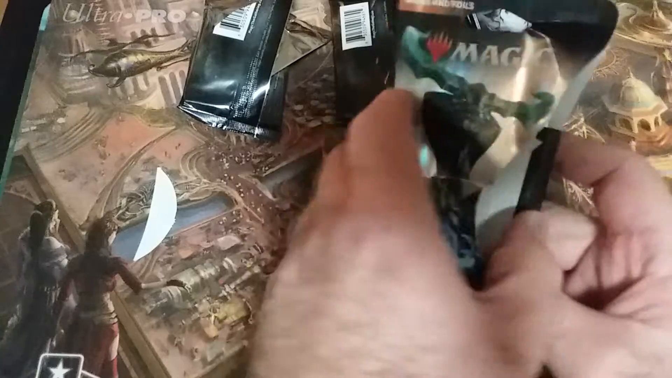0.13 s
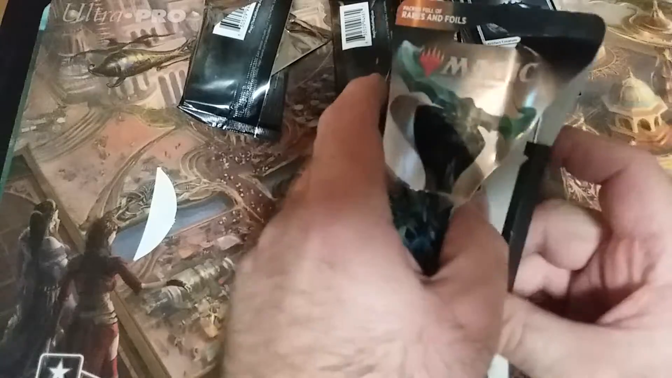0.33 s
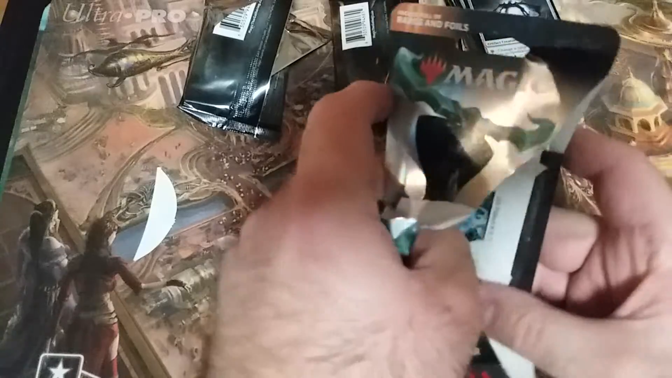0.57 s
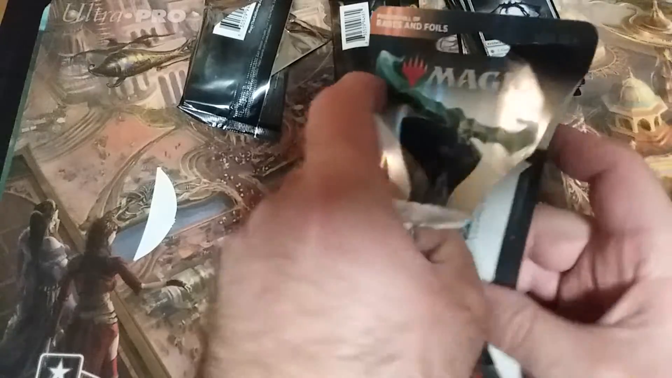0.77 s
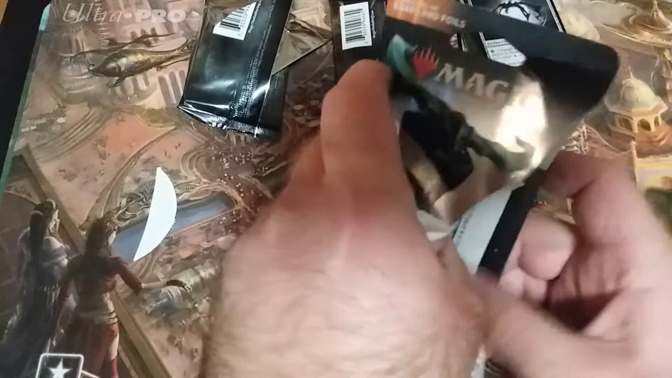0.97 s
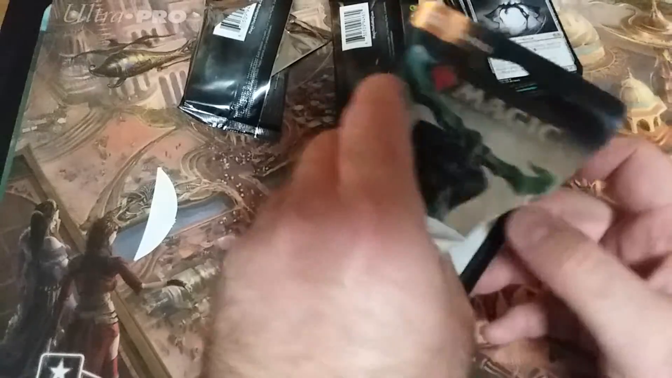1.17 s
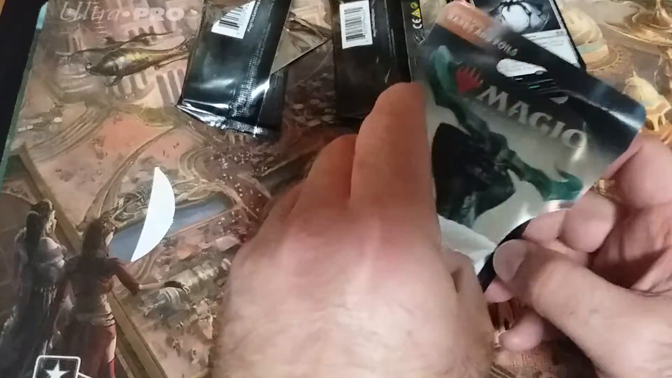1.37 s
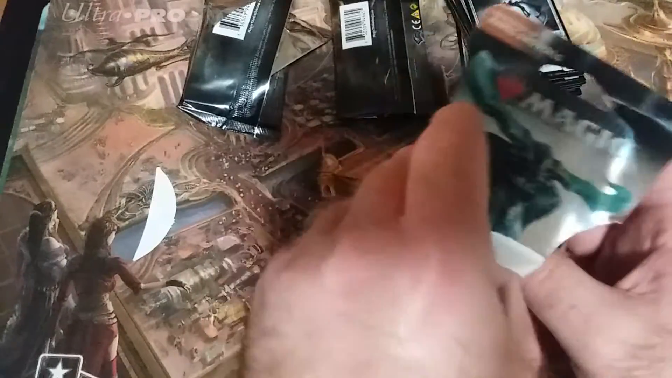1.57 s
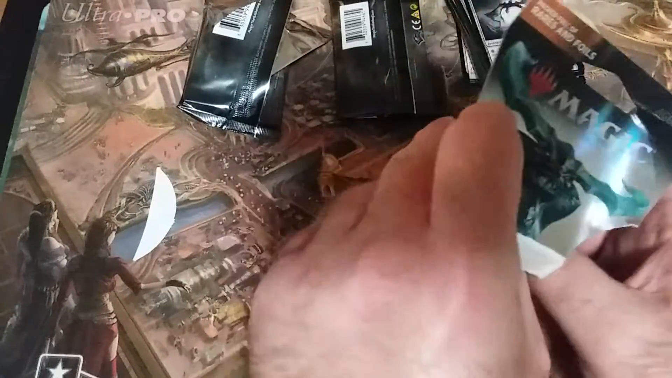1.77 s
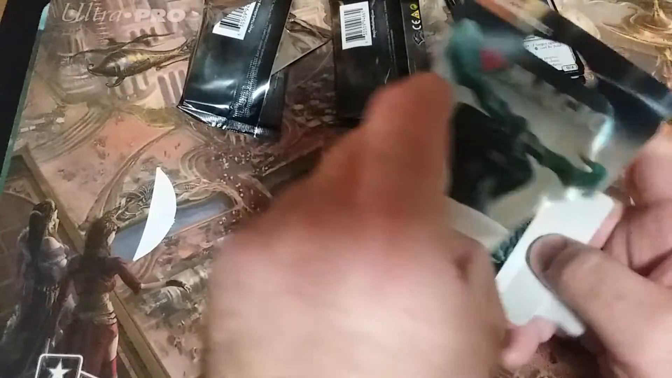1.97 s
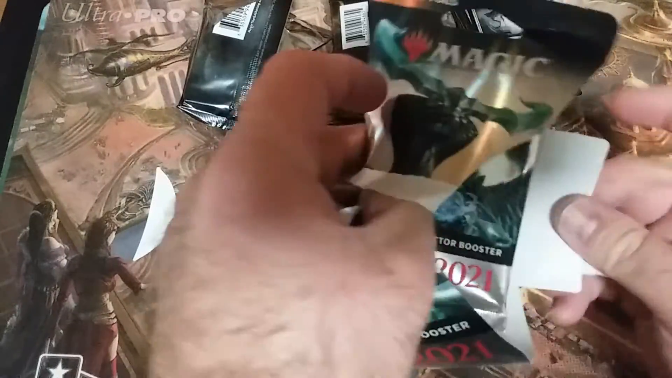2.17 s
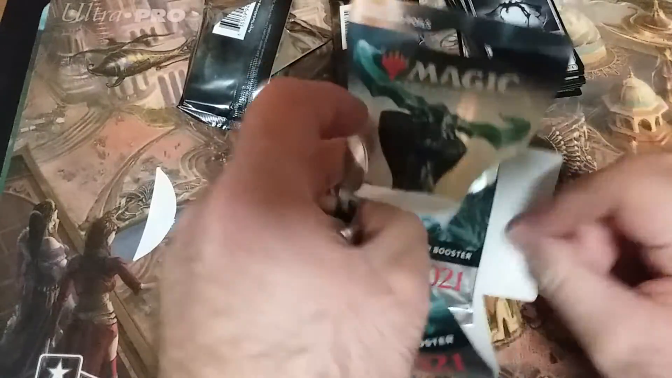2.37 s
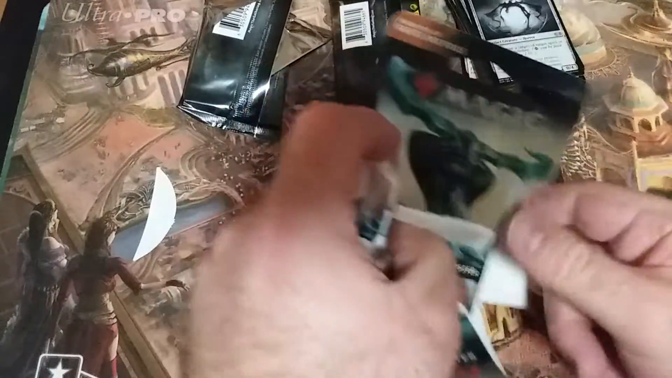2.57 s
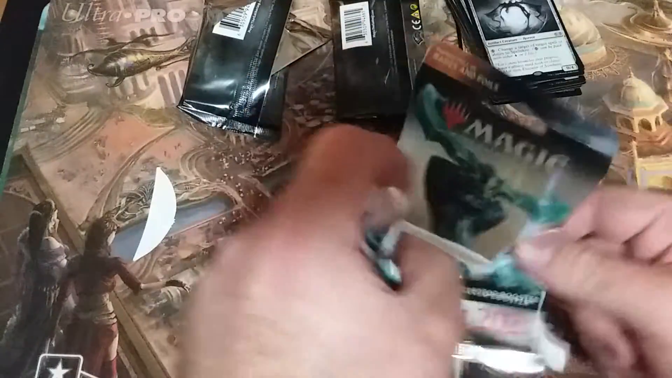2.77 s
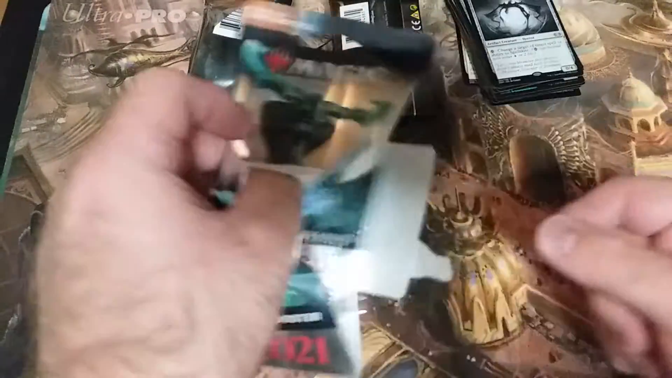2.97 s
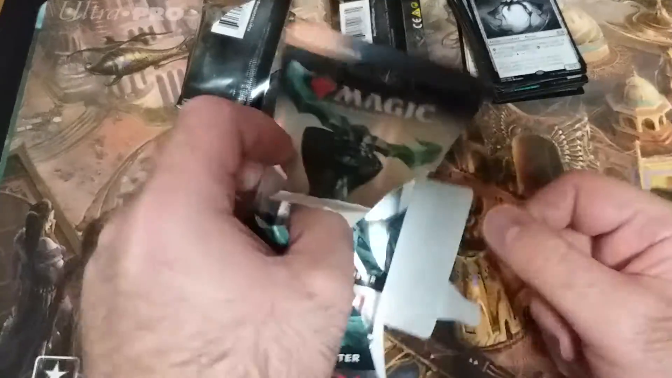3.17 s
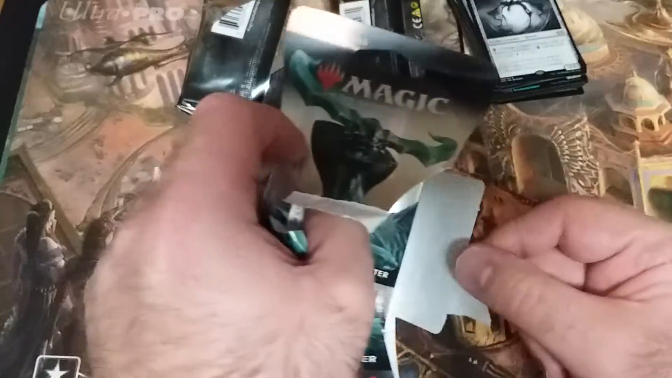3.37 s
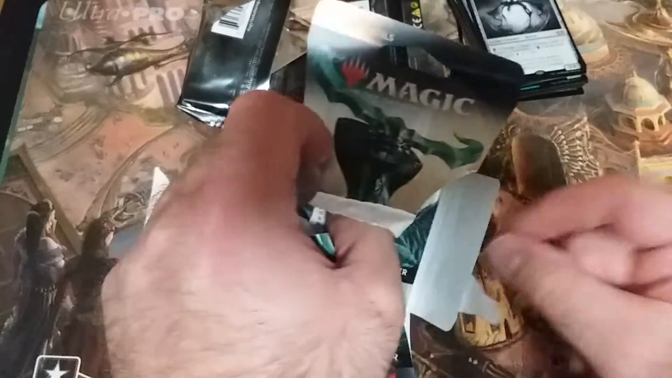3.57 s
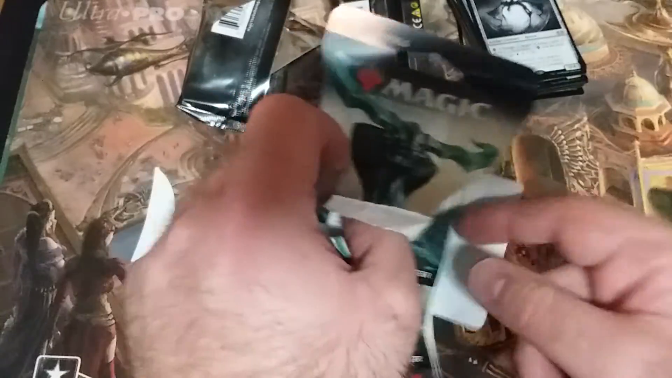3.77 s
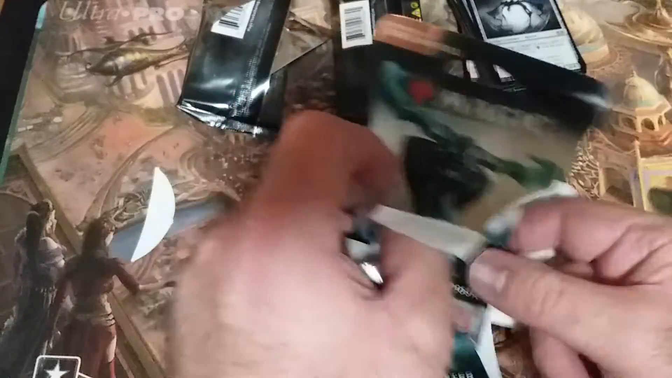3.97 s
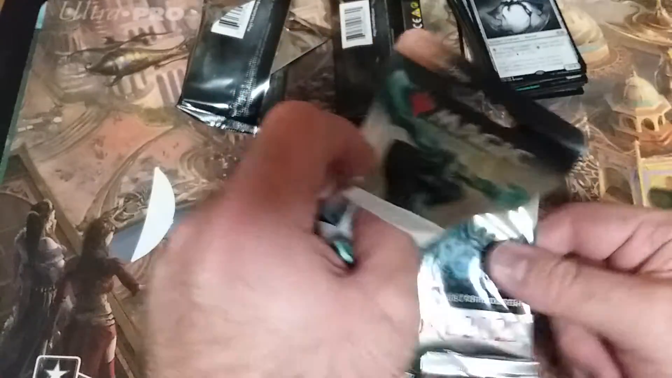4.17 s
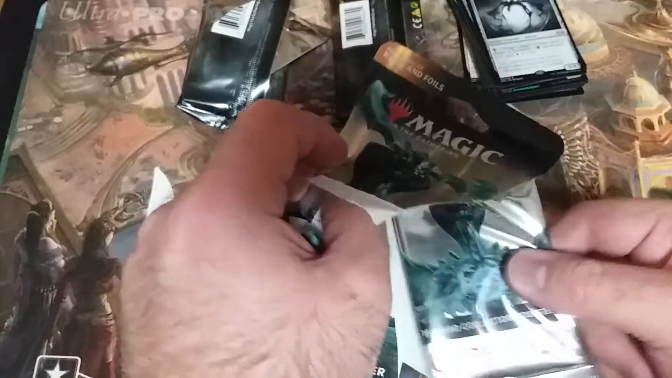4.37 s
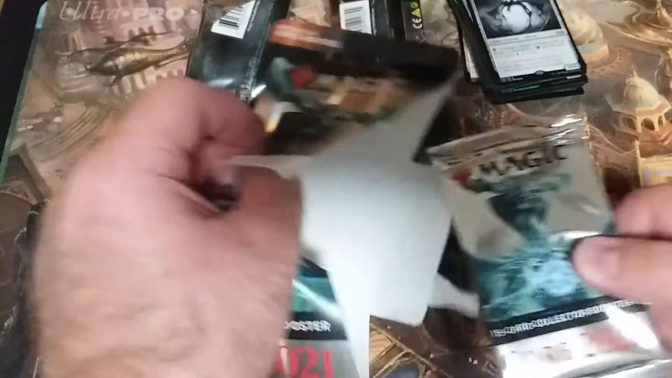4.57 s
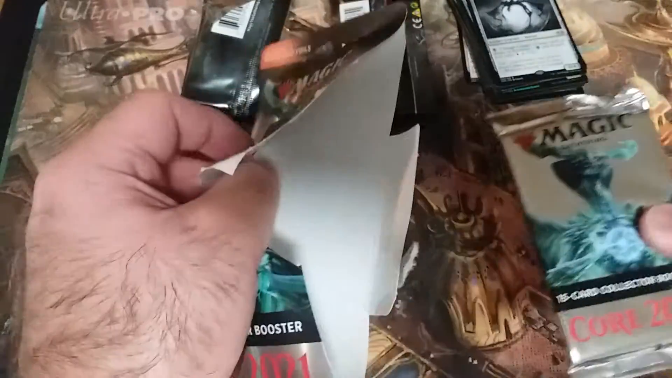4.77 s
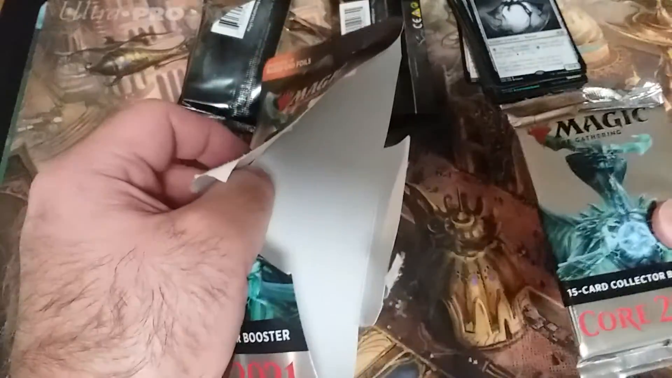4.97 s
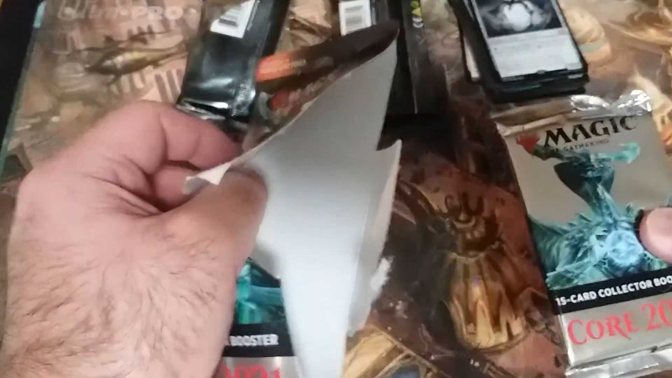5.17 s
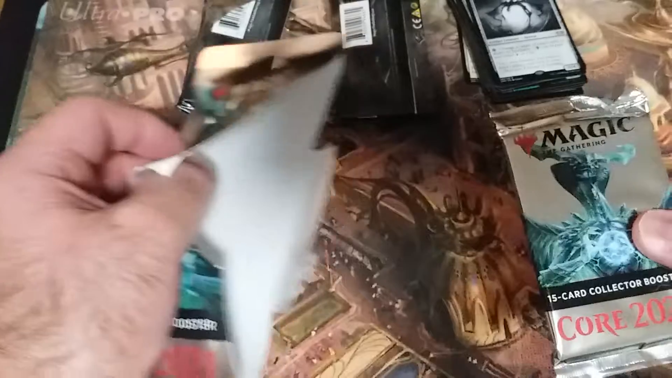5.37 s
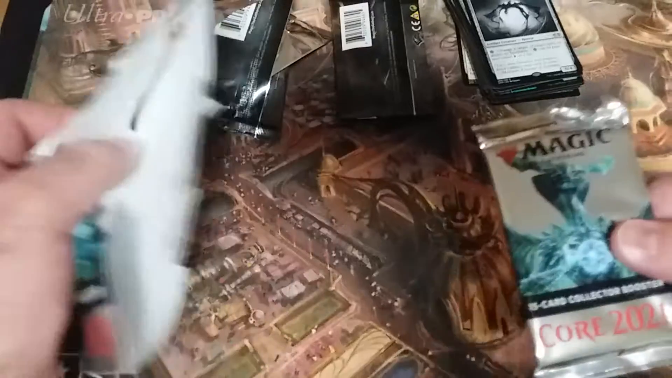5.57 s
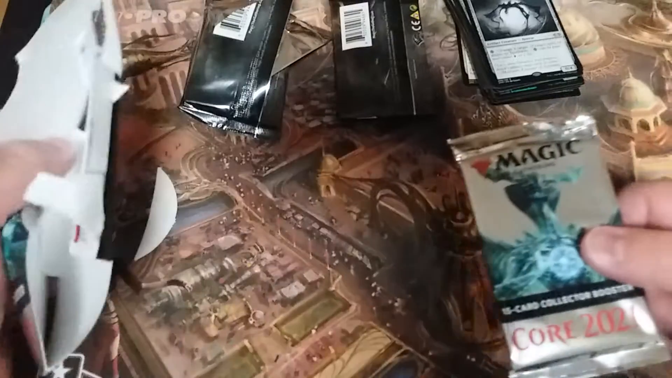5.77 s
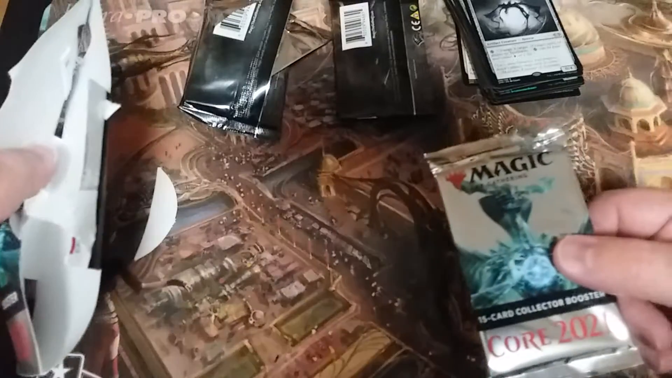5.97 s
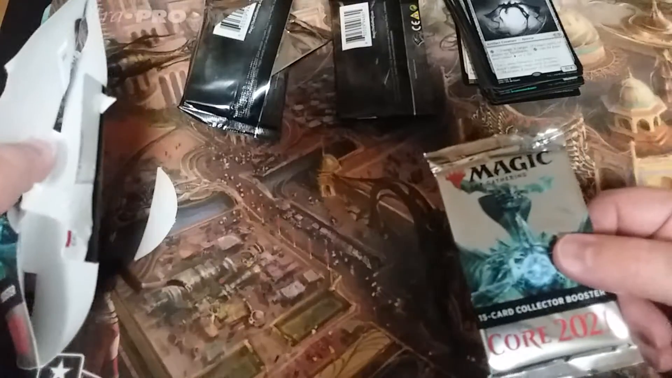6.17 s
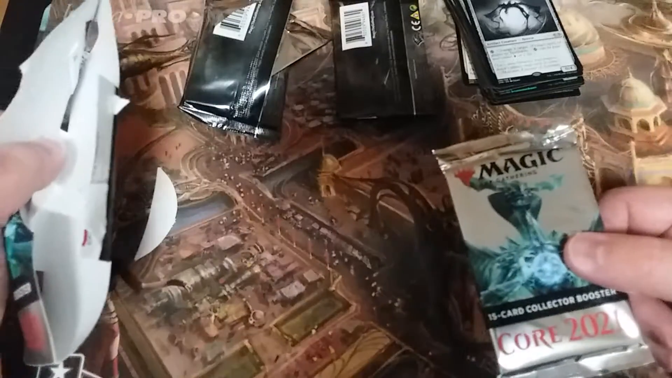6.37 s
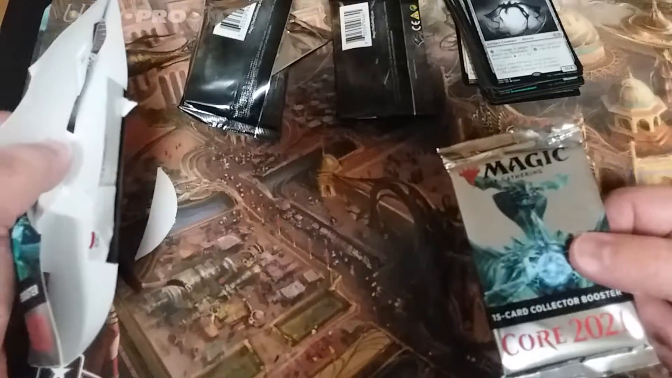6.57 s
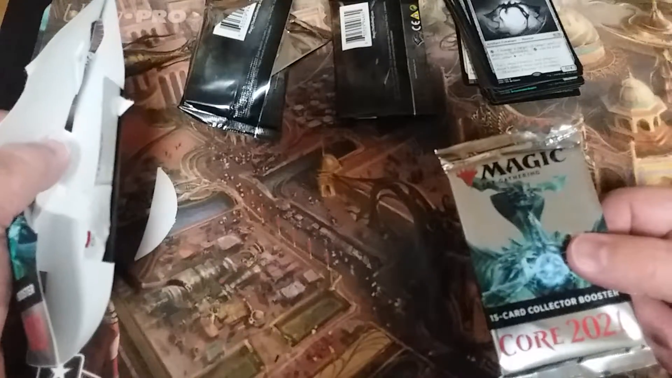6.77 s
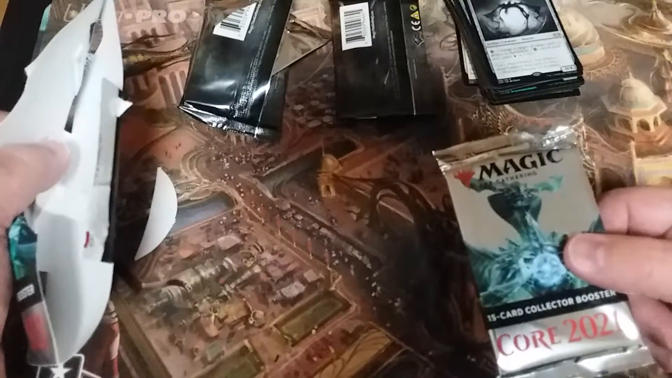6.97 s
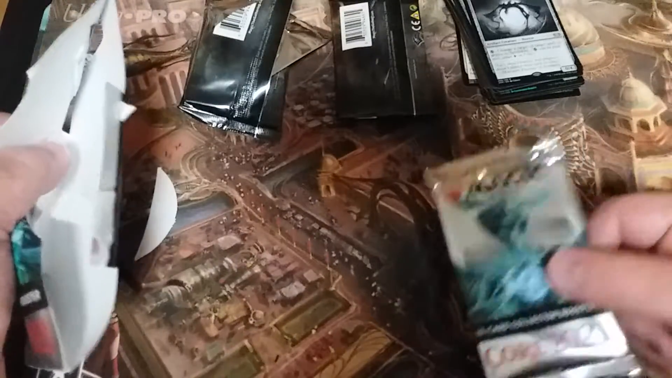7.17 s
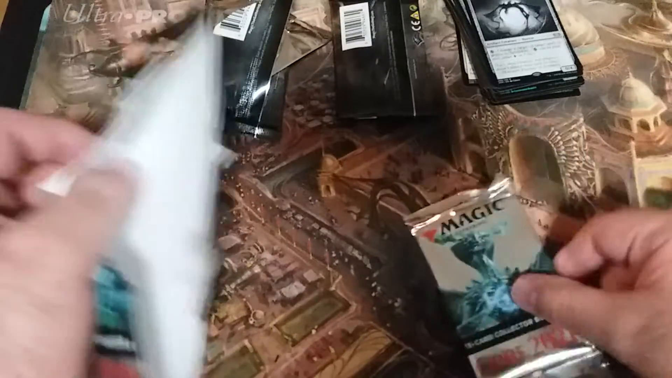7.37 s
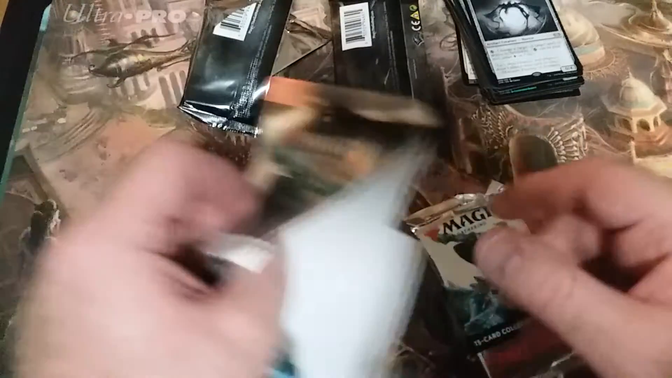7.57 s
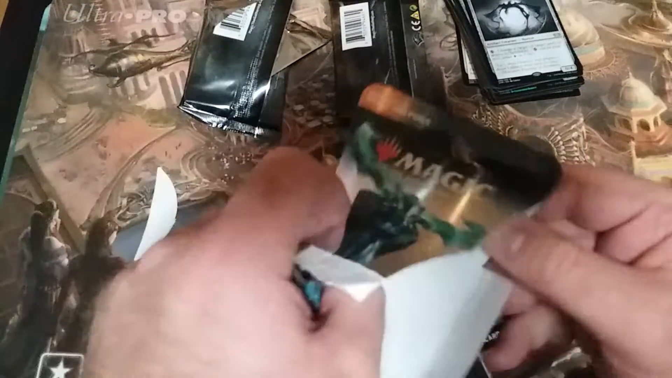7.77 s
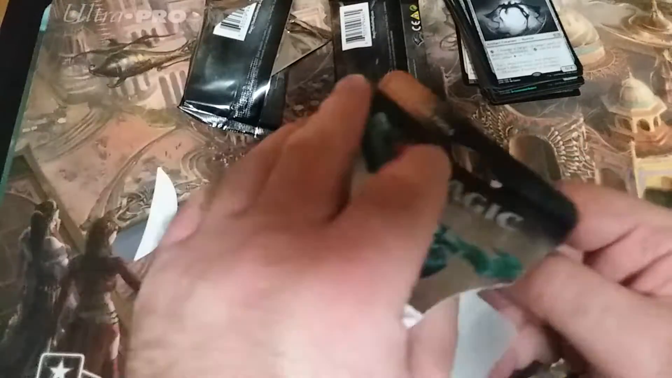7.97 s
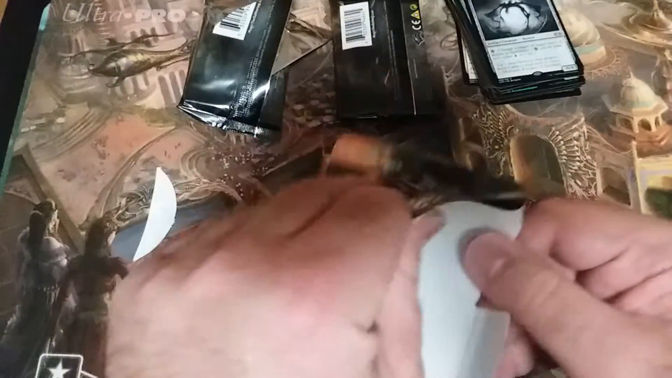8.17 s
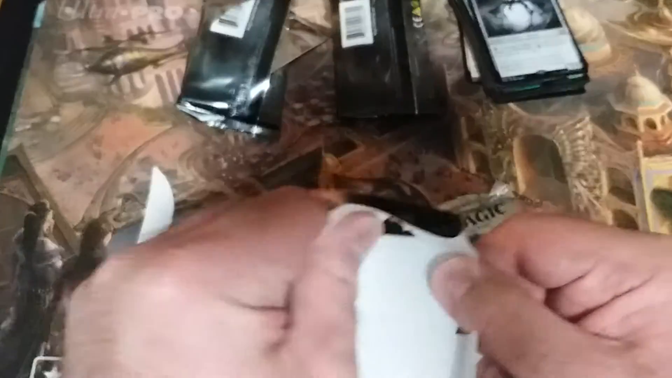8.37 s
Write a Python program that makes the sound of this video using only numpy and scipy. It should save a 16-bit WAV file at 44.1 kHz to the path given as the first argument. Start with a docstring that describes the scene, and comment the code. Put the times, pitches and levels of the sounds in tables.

```python
"""Sharp snaps, fine crackle and rubbing, close by in a small room: two hands tear open a card-backed blister pack.
The glued layers peel and a foil packet is pulled out; after a pause a hand bumps the table and the empty
pack is picked up again. A faint hum and hiss lie underneath.
Strokes are slip-modulated noise in card, shell and fibre colours; snaps and knocks are decaying random
impulses through filters and resonances; the room is decaying noise used as an impulse response."""
import sys
import numpy as np
from scipy import signal
from scipy.fft import rfft, irfft, next_fast_len
from scipy.io import wavfile

SR = 44100
rng = np.random.default_rng(int(sys.argv[2]) if len(sys.argv) > 2 else 0)


def dump(signal):
    """Clip the signal to [-1, 1] and save it as 16-bit WAV at the path in sys.argv[1]."""
    limited = np.clip(np.atleast_2d(signal).T, -1, 1)
    pcm = np.round(limited * 32767).astype(np.int16)
    wavfile.write(sys.argv[1], SR, pcm)


N = 371763
TIME_S = np.arange(N) / SR

# Quiet room noise. Each row: frequency in Hz, relative density in dB per Hz.
AIR_SPECTRUM = [(35, -13.5), (58, -4.5), (130, -1.5), (280, -6), (450, -18), (900, -21.5), (1900, -23),
                (3000, -29), (6000, -31), (16000, -27)]
AIR_DB = -68.5
# Hum and narrow hisses. Each row: frequency in Hz, width in Hz, level in dB.
HUM_BANDS = [(154, 6, -73), (243, 5, -81), (2085, 70, -84), (8500, 600, -86), (13700, 1100, -84)]
# Left-right likeness. Each row: frequency in Hz, coherence from 0 to 1.
COHERENCE = [(600, 0.74), (1200, 0.34), (2200, 0.39), (4000, 0.092), (8000, 0)]

# Pulls and slides of the fingers. Each row: start in seconds, length in seconds, rubbing level before
# the sag in dB, pitch in Hz, tearing fibres against the rubbing in dB.
FINGER_STROKES = [(0.0, 0.061, -44, 2200, -4.5), (0.113, 0.092, -51, 2200, -5.5),
                  (0.24, 0.091, -64.5, 2216, -3), (0.319, 0.34, -55, 2200, -5.5),
                  (0.459, 0.14, -48, 2300, -3), (0.535, .06, -34.5, 2800, -5),
                  (0.612, 0.052, -37, 3150, -2), (0.717, .11, -47.5, 1870, -5),
                  (0.859, 0.045, -38.5, 1950, -4), (1.047, 0.025, -43.5, 2000, -3.5),
                  (1.111, 0.12, -49.5, 1700, -7), (1.236, 0.11, -43.5, 2000, -7.5),
                  (1.38, .15, -53.5, 2050, -4), (1.549, 0.12, -45.5, 2120, -6.5),
                  (1.71, 0.28, -56, 1850, -6.5), (1.839, 0.18, -47.5, 1970, -5.5),
                  (1.924, 0.049, -36, 1910, -6.5), (2, 0.18, -49, 2250, -4),
                  (2.187, 0.11, -45.5, 1720, -4.5), (2.345, 0.063, -48.5, 1700, -8.5),
                  (2.45, 0.19, -46.5, 1650, -7.5), (2.634, 0.17, -43.5, 1950, -7),
                  (2.833, 0.093, -34.5, 2700, -4), (2.964, 0.047, -31, 2500, -1.5),
                  (3.083, .11, -55, 2100, -18), (3.19, .26, -63, 1650, -18), (3.445, 0.2, -57, 1600, -12.5),
                  (3.835, 0.09, -44, 1800, -10.5), (3.938, 0.077, -43, 1700, -10),
                  (4.033, 0.045, -46, 2100, -8.5), (4.105, 0.082, -41.5, 2400, -5.5),
                  (4.199, 0.053, -34.5, 3100, -3), (4.292, 0.044, -48.5, 2600, 3.5),
                  (4.39, 0.187, -57.5, 2400, 4.5), (4.492, 0.068, -36, 1887, -5.5),
                  (4.565, 0.038, -40, 2530, -3.5), (4.693, 0.024, -42.5, 1850, -8),
                  (7.31, 0.13, -68.5, 2200, 1), (7.438, 0.076, -58.5, 1600, -5.5),
                  (7.711, 0.051, -54, 2000, -9.5), (7.746, 0.11, -42.5, 2100, -6),
                  (7.879, 0.1, -43, 2900, -4), (7.998, 0.098, -48, 2500, -10),
                  (8.057, 0.016, -33, 1950, -4.5), (8.118, 0.042, -55.5, 2100, 3),
                  (8.196, 0.34, -55.5, 2750, -2.5)]
ATTACK_S, SAG_DB_PER_S, RELEASE_DB_PER_S = 0.013, 7.5, 218   # release adds to the sag
# The emptied pack brushes the table as it is moved aside. Each row: centre in seconds,
# time from centre to 1/e in seconds, rubbing level in dB.
TABLE_BRUSHES = [(5.391, 0.079, -65), (5.643, 0.052, -62)]
# Flexing card. Each row: frequency in Hz, relative density in dB per Hz.
FLEX_SPECTRUM = [(260, -11), (450, -13), (600, -2.5), (900, 0), (1150, -3.5), (1500, -13)]
# Tearing fibres. Each row: frequency in Hz, relative density in dB per Hz.
TEAR_SPECTRUM = [(3600, -16), (5000, 5.5), (6800, 0), (8500, 3), (10500, -3), (13000, 1.5), (16000, -7.5)]
# Deep wobble of the pack. Each row: frequency in Hz, relative density in dB per Hz.
WOBBLE_SPECTRUM = [(45, -13.5), (100, -7), (290, -2.5), (420, -7), (700, -26)]
# Broad resonances of the plastic shell. Each row: frequency in Hz, width in Hz, gain in dB.
SHELL_MODES = [(1516, 380, 2.5), (2460, 350, 1), (3000, 1100, -1.5), (4470, 600, -2.5)]
# small creases giving way: shell ticks against the rubbing, their bright edge against the shell ticks
TICKS_PER_S, TICK_DB, TICK_SPREAD_DB, TICK_EDGE_DB = 30, -11.5, 1, -7.5

# large, low panels take the card with them, small high folds hardly do
MIDDLE_HZ = 2050
FLEX_DB, FLEX_DB_PER_OCTAVE = -8.5, -7.5   # at MIDDLE_HZ, against the rubbing
SNAP_CARD_DB, SNAP_CARD_DB_PER_OCTAVE = -9, -12   # at MIDDLE_HZ, against the plastic

# Buckles of the plastic. Each row: time in seconds, energy over 1 ms in dB, base decay in seconds
# (each part stretches it), pitch in Hz, crack against the plastic in dB.
PLASTIC_SNAPS = [(0.0187, -32.5, 0.0025, 1667, -3.5), (0.217, -30.5, 0.0071, 2870, -6),
                 (0.5412, -20, 0.056, 2306, -5.5), (0.611, -14.5, 0.012, 2500, -2),
                 (0.6334, -21, 0.0014, 2870, 4), (0.6525, -15.5, 0.0058, 2938, -1.5),
                 (0.6611, -24, 0.0018, 3160, -5.5), (0.7362, -19, 0.0052, 2190, -3.5),
                 (0.798, -28.5, 0.011, 1690, -21), (0.8746, -30, 0.0015, 3130, 2.5),
                 (0.8796, -15.5, 0.01, 1880, -5), (1.041, -44, 0.0071, 2450, 5.5),
                 (1.156, -36.5, .008, 2580, 0), (1.256, -24, 0.025, 1800, -13),
                 (1.497, -43, 0.007, 2600, 1.5), (1.2188, -31.5, 0.0078, 1828, -7.5),
                 (1.275, -22, 0.013, 1800, -17), (1.3614, -20.5, 0.022, 2100, -8),
                 (1.652, -13, 0.004, 1950, -15), (1.944, -9, 0.012, 1750, -8.5),
                 (2.1975, -33, 0.0051, 2090, 2), (2.297, -31, 0.0065, 1800, 0.5),
                 (2.3654, -26.5, 0.01, 1740, -3), (2.7117, -20, .007, 1940, -15),
                 (2.8284, -24, 0.0047, 3436, -1), (2.8509, -18, 0.0091, 2300, -3),
                 (2.8914, -22.5, 0.012, 2400, 0.5), (2.9731, -19, 0.0047, 1695, -9.5),
                 (3.0101, -25.5, 0.0017, 2526, 8), (3.1404, -24, 0.0088, 1810, -15.5),
                 (3.448, -42, 0.012, 1760, -9), (3.625, -37, 0.023, 1734, 2.5),
                 (3.8326, -38.5, .09, 1740, 1), (3.8575, -29, 0.022, 1900, -1.5),
                 (4.2252, -17, 0.0044, 2250, -2), (4.233, -17.5, 0.033, 1850, -8.5),
                 (4.2492, -21.5, 0.0058, 2270, 2.5), (4.3022, -19, 0.0035, 2400, -3),
                 (4.3079, -18, .004, 2610, -1.5), (4.337, -32.5, 0.0073, 1500, -3.5),
                 (4.3502, -16, 0.00098, 2600, -5.5), (4.439, -23.5, 0.003, 2350, 0),
                 (4.4505, -32.5, .003, 2600, 3), (4.48, -25, .006, 2610, 1.5),
                 (4.4839, -14, 0.013, 2800, -1.5), (4.4905, -12, 0.022, 1950, -4.5),
                 (4.5015, -19, .012, 1797, -3), (4.604, -23, 0.0067, 1589, -3),
                 (4.7103, -26, 0.0097, 1790, 0), (7.322, -45.5, 0.086, 1920, -1),
                 (7.455, -49, 0.0036, 2350, 6), (7.7566, -21.5, 0.015, 2100, -9),
                 (7.8172, -20, 0.028, 2650, -5), (8.076, -17.5, 0.022, 2510, -4.5),
                 (8.218, -39, .012, 2150, -1.5)]

# Card flaps and knocks of the pack, with their thuds. Each row: time in seconds, thud energy over 1 ms
# in dB, pitch in Hz, card against the thud in dB.
PACK_KNOCKS = [(0.052, -37.5, 266, -20), (0.199, -48, 110, -4), (0.611, -37, 230, 5), (0.879, -33, 272, 9),
               (1.136, -37, 150, -1), (1.358, -20, 288, -1.5), (1.945, -30.5, 310, 6.5),
               (2.494, -33, 142, 9), (2.712, -39.5, 170, 5), (3.0, -32, 137, 5.5), (3.142, -39.5, 165, -3),
               (3.624, -49, 200, 14), (3.859, -33.5, 115, 9.5), (4.493, -30.5, 110, 12),
               (4.604, -40, 200, 20), (4.712, -45.5, 110, 23), (7.33, -33.5, 118, -19),
               (7.49, -18.5, 166, -13), (7.755, -32.5, 166, -5), (7.828, -24, 196, 4.5),
               (8.078, -30, 200, 0)]
KNOCK_BASE_DECAY_S = 0.01   # each part stretches it
KNOCK_SHELL_DB, KNOCK_SHELL_HZ = -8, 1840   # shell against the card
RUMBLE_CYCLES = 43   # cycles for a thud's rumble to fall 60 dB

# Room decay. Each row: frequency in Hz, time to fall 60 dB in seconds.
ROOM_DECAY = [(100, 0.99), (1500, 0.47), (5000, 0.77), (16000, .35)]
CUTOFF_HZ = 16000


def from_db(db):
    """Decibels to gain."""
    return 10 ** (np.asarray(db) / 20)


def rms_one(x):
    """Scale to rms 1."""
    return x / np.sqrt(np.mean(x ** 2) + 1e-20)


def at_hz(points, hz):
    """Read a table on a log-frequency axis."""
    points = np.array(points)
    return np.interp(np.log(hz), np.log(points[:, 0]), points[:, 1])


def band(x, low_hz, high_hz, order=2):
    """Causal band-pass."""
    edges_hz = [low_hz, min(high_hz, .47 * SR)]
    return signal.sosfilt(signal.butter(order, edges_hz, "band", fs=SR, output="sos"), x + 1e-18)


def resonate(x, hz, width_hz):
    """One two-pole resonance with gain 1 at its top."""
    radius = np.exp(-np.pi * width_hz / SR)
    zeros = np.array([1, 0, -1]) * (1 - radius * radius) / 2
    poles = [1, -2 * radius * np.cos(2 * np.pi * hz / SR), radius * radius]
    return signal.lfilter(zeros, poles, x + 1e-18)


def stereo(pair, alike):
    """Left and right of a given likeness from two unrelated signals."""
    alike = np.clip(alike, -1, 1)
    middle = np.sqrt(1 + alike) * pair[0]
    side = np.sqrt(1 - alike) * pair[1]
    return (middle + side * np.array([[1], [-1]])) / np.sqrt(2)


def coloured(pair, spectrum):
    """Two unrelated excitations become a stereo sound of the given colour; rms 1."""
    size = next_fast_len(N)
    hz = np.maximum(np.arange(size // 2 + 1) * SR / size, 1)
    low_end = 1 / (1 + (spectrum[0][0] / hz) ** 4)
    high_end = 1 / (1 + (hz / spectrum[-1][0] / 2) ** 8)
    gain = from_db(at_hz(spectrum, hz)) * low_end * high_end
    both = stereo(rfft(pair, size), at_hz(COHERENCE, hz))
    return rms_one(irfft(both * gain, size)[:, :N])


def background():
    """Low room noise, with hum and hiss as noise in narrow resonances."""
    out = from_db(AIR_DB) * coloured(rng.standard_normal((2, N)), AIR_SPECTRUM)
    for hz, width_hz, level_db in HUM_BANDS:
        noise = stereo(rng.standard_normal((2, N)), at_hz(COHERENCE, hz))
        # two wider resonances in series give about the listed width
        once = resonate(noise, hz, 1.5 * width_hz)
        out += from_db(level_db) * rms_one(resonate(once, hz, 1.5 * width_hz))
    return out


def card_share_db(hz, middle_db, db_per_octave):
    """How strongly the card joins in when the plastic sounds at this pitch."""
    return middle_db + db_per_octave * np.log2(hz / MIDDLE_HZ)


def strokes():
    """Each stroke takes hold, sags and lets go: strengths of flexing, rubbing and tearing, and rubbing pitch."""
    flex, rub, tear, pitch = np.zeros((4, N))
    for start_s, length_s, level_db, hz, fibres_db in FINGER_STROKES:
        t = np.maximum(TIME_S - start_s, 0)
        fade_db = SAG_DB_PER_S * t + RELEASE_DB_PER_S * np.maximum(t - length_s, 0)
        attack = np.minimum(t / ATTACK_S, 1)
        power = (attack * from_db(level_db - np.minimum(fade_db, 200))) ** 2
        rub += power
        pitch += power * hz
        tear += power * from_db(fibres_db) ** 2
        flex += power * from_db(card_share_db(hz, FLEX_DB, FLEX_DB_PER_OCTAVE)) ** 2
    # overlapping strokes share a power-weighted pitch
    pitch_hz = (pitch + 1e-18 * MIDDLE_HZ) / (rub + 1e-18)
    return np.sqrt(flex), np.sqrt(rub), np.sqrt(tear), pitch_hz


def grains(per_s, spread_db, grain_s, smooth):
    """Strength of friction: tiny slips of uneven size at random moments over a smooth share."""
    sizes = from_db(spread_db * np.minimum(rng.exponential(1, N), 4))
    sizes = sizes * (rng.random(N) < per_s / SR)
    power = signal.lfilter([1], [1, -np.exp(-1 / (grain_s * SR))], sizes ** 2 + 1e-18)
    smooth = np.clip(smooth, 0, 1)
    return np.sqrt(smooth + (1 - smooth) * power / power.mean())


def drift(knots_per_s):
    """Random curve of rms 1 through this many new values a second."""
    knots = rng.standard_normal(N // 40)
    return rms_one(np.interp(TIME_S * knots_per_s, np.arange(len(knots)), knots))


def shell(x):
    """The plastic shell's resonances in parallel with alternating signs."""
    return sum((-1) ** k * from_db(gain_db) * resonate(x, hz, width_hz)
               for k, (hz, width_hz, gain_db) in enumerate(SHELL_MODES))


def rubbing(grip, pitch_hz, width_octaves, patchy_db, count=12):
    """Friction noise in the bent shell; its brightest part slides as fingers move and tension changes."""
    edges_hz = np.geomspace(1100, 5200, count + 1)
    noise = shell(rng.standard_normal((2, 2, N)) * grip)
    out, power = 0, 0
    for k, (low_hz, high_hz) in enumerate(zip(edges_hz, edges_hz[1:])):
        hz = np.sqrt(low_hz * high_hz)
        part = band(stereo(noise[k % 2], at_hz(COHERENCE, hz)), low_hz, high_hz)
        # fingers damp now one part of the shell, now another
        patches = from_db(patchy_db * drift(18))
        gain = patches / (1 + (np.log2(hz / pitch_hz) / width_octaves) ** 2)
        out = out + gain * part
        power = power + gain ** 2 * part.var()
    return out / np.sqrt(power)


def ticks(rub):
    """Small creases give way at random under every stroke and tick in the shell."""
    sizes = from_db(TICK_SPREAD_DB * np.minimum(rng.exponential(1, N), 2))
    sizes = sizes * (rng.random(N) < TICKS_PER_S / SR)
    clicks = stereo(rng.choice([-1, 1], (2, N)), 0.75) * sizes
    edge = from_db(TICK_EDGE_DB) * rms_one(band(clicks, 2700, 16000))
    return from_db(TICK_DB) * rub * (rms_one(shell(clicks)) + edge)


def rustle():
    """Card flexes, surfaces rub and fibres part on shared slips of the hands; ticks and a deep wobble join."""
    flex, rub, tear, pitch_hz = strokes()
    brush = sum(from_db(level_db) * np.exp(-((TIME_S - centre_s) / half_s) ** 2)
                for centre_s, half_s, level_db in TABLE_BRUSHES)
    slips = grains(per_s=610, spread_db=4.0, grain_s=.0012, smooth=0.46)
    fibres = grains(per_s=290, spread_db=0.5, grain_s=0.00056, smooth=0.59)
    noise = rng.standard_normal((3, 2, N))
    out = flex * coloured(noise[0] * slips, FLEX_SPECTRUM)
    out += (rub + brush) * rubbing(slips, pitch_hz, width_octaves=0.83, patchy_db=4.0)
    out += (tear + 0.44 * brush) * coloured(noise[1] * slips * fibres, TEAR_SPECTRUM)
    wobble = from_db(-8.5) * flex * coloured(noise[2], WOBBLE_SPECTRUM)
    return out + ticks(rub) + wobble


def burst(t, t60_s, alike, release=0, swell_db=-22, swell_s=0.00067):
    """Random impulses swell very briefly, jerk at t = 0 and die in a rattle."""
    fall = from_db(-60 * np.abs(t) / max(t60_s, 1e-3))
    swell = from_db(swell_db) * np.exp(-np.abs(t) / swell_s)
    impulses = stereo(rng.choice([-1, 1], (2, len(t))), alike) * np.where(t < 0, swell, fall)
    impulses[:, np.searchsorted(t, 0)] += release
    return impulses


def plastic_pop(t, decay_s, hz):
    """Large low panels pop with a clear pitch, small high folds crack broadly."""
    width_hz = min(1150 * (hz / 2000) ** 2, 3200)
    plastic = shell(band(burst(t, 2.3 * decay_s, alike=.5, release=5.3), 1150, 5200))
    return resonate(resonate(plastic, hz, width_hz), hz, width_hz)


def crack(t, decay_s):
    """The bright edge of a snap, a little to the right."""
    edge = band(burst(t, 2.1 * decay_s, alike=0.055, release=1.6), 3800, 17000)
    return (edge + 2.3 * resonate(edge, 3400, width_hz=3100)) * from_db([[-1.5], [0]])


def card_flap(t, decay_s):
    """The cardboard backing flaps: a burst in a low-mid band."""
    return band(burst(t, 2.0 * decay_s, alike=1.0, release=1.8), 540, 1500, order=3)


def with_energy(x, level_db):
    """Scale a short stereo sound to the energy that this level has over one millisecond."""
    return x * from_db(level_db) * np.sqrt(2 * SR / 1000 / np.sum(x ** 2))


def add(out, sound, start_s):
    """Place a short stereo sound at a time."""
    at = max(round(start_s * SR), 0)
    out[:, at:at + sound.shape[1]] += sound[:, :N - at]


def snaps(size=4096):
    """Each buckle cracks, rings the plastic shell around its own pitch and flaps the card."""
    out = np.zeros((2, N))
    t = np.arange(size) / SR - .01   # t = 0 lies 10 ms into the buffer
    for snap_s, level_db, decay_s, hz, crack_db in PLASTIC_SNAPS:
        card_db = level_db + card_share_db(hz, SNAP_CARD_DB, SNAP_CARD_DB_PER_OCTAVE)
        sound = with_energy(plastic_pop(t, decay_s, hz), level_db)
        sound += with_energy(crack(t, decay_s), level_db + crack_db)
        sound += with_energy(card_flap(t, decay_s), card_db)
        add(out, sound, snap_s + t[0])
    return out


def thud(t, hz):
    """A dull push and a short rumble that lasts longer the lower it is."""
    push = burst(t, 0.036, alike=.9)
    rumble = 0.34 * burst(t, RUMBLE_CYCLES / hz, alike=1.0)
    return band(push + rumble, .48 * hz, 1.9 * hz, order=3) * from_db([[-1.5], [0]])


def knocks(size=12000):
    """Each knock or flap of the pack sums a thud, a flap of the card and a pop of the shell."""
    out = np.zeros((2, N))
    t = np.arange(size) / SR - .01   # t = 0 lies 10 ms into the buffer
    for knock_s, level_db, hz, flap_db in PACK_KNOCKS:
        card_db = level_db + flap_db
        sound = with_energy(thud(t, hz), level_db)
        sound += with_energy(card_flap(t, KNOCK_BASE_DECAY_S), card_db)
        pop = plastic_pop(t, KNOCK_BASE_DECAY_S, KNOCK_SHELL_HZ)
        sound += with_energy(pop, card_db + KNOCK_SHELL_DB)
        add(out, sound, knock_s + t[0])
    return out


def room(x, near_db, near_t60_s, tail_db, size=40000):
    """Quick reflections from table and hands, then the room's tail, as noise decaying band by band."""
    t, response = np.arange(size) / SR, 0
    edges_hz = np.geomspace(50, 18000, 10)
    white = rng.standard_normal((2, 2, size))
    for k, (low_hz, high_hz) in enumerate(zip(edges_hz, edges_hz[1:])):
        hz = np.sqrt(low_hz * high_hz)
        near = from_db(-60 * t / near_t60_s) * (t > .003)
        tail = from_db(-60 * t / at_hz(ROOM_DECAY, hz)) * (t > .008)
        near = from_db(near_db) * near / np.linalg.norm(near)
        tail = from_db(tail_db) * tail / np.linalg.norm(tail)
        dulling_db = -1.2 * max(np.log2(hz / 2000), 0)
        noise = stereo(white[k % 2], at_hz(COHERENCE, hz)) * np.hypot(near, tail)
        response = response + from_db(dulling_db) * band(noise, low_hz, high_hz)
    return signal.fftconvolve(x, response, axes=1)[:, :N]


def scene():
    """The pack, direct and through the room, over the background."""
    pack = snaps() + knocks() + rustle()
    return pack + room(pack, near_db=-11.0, near_t60_s=0.2, tail_db=-18) + background()


def record(dry):
    """The top is cut steeply by an elliptic low-pass."""
    return signal.sosfilt(signal.ellip(10, .1, 80, CUTOFF_HZ, fs=SR, output="sos"), dry)


dry = scene()
out = record(dry)
dump(out)
```